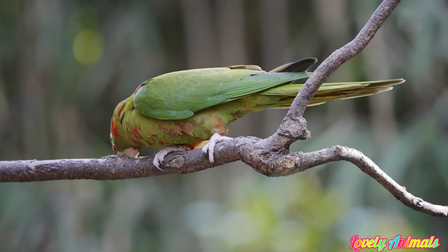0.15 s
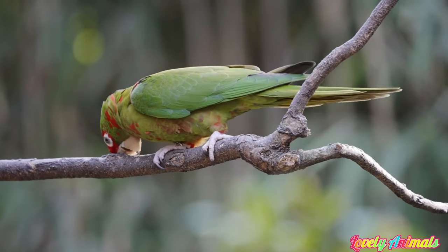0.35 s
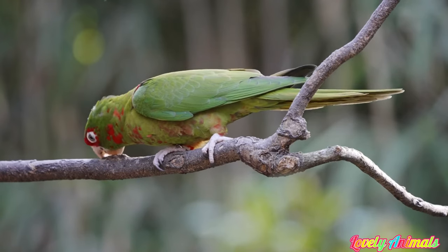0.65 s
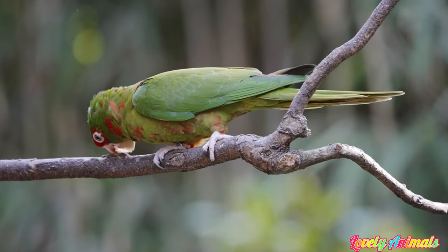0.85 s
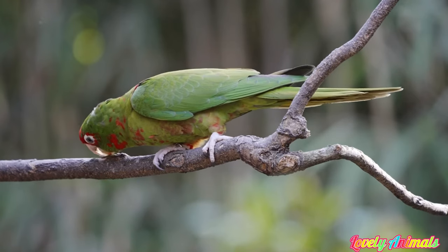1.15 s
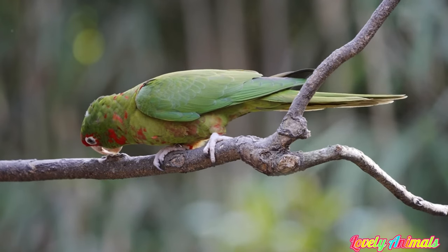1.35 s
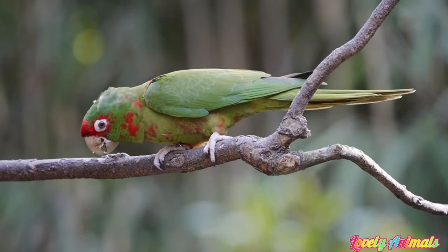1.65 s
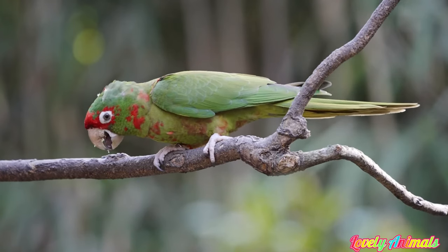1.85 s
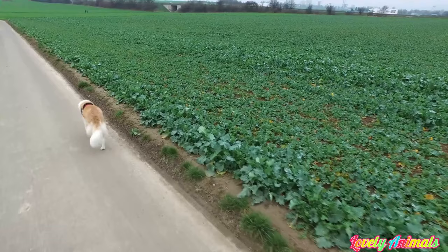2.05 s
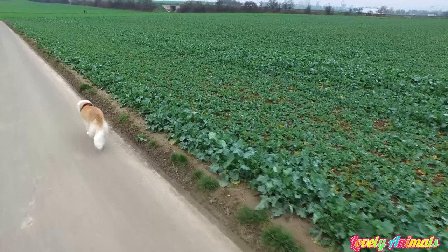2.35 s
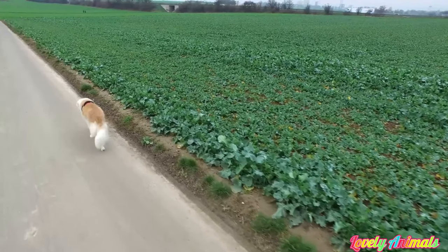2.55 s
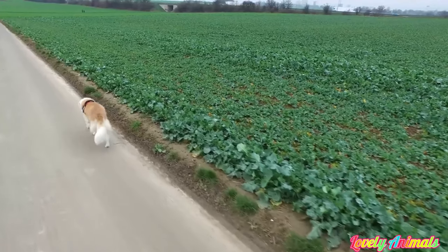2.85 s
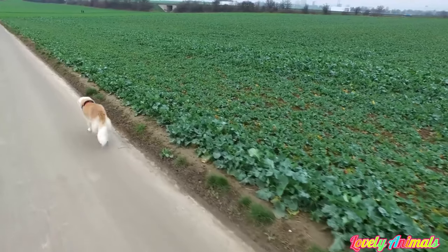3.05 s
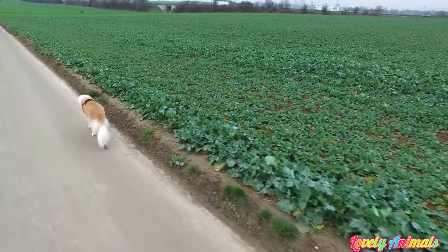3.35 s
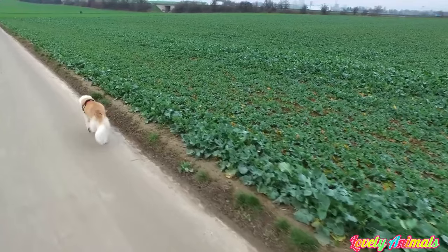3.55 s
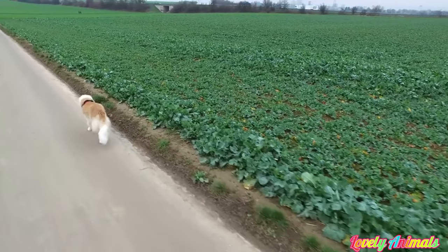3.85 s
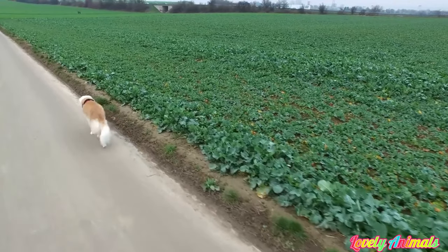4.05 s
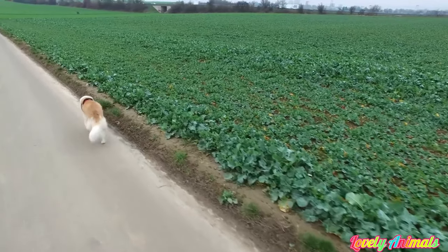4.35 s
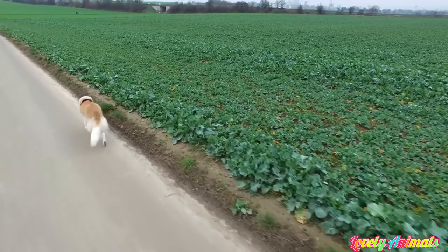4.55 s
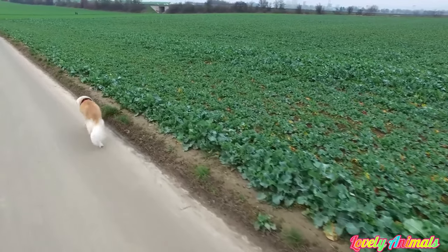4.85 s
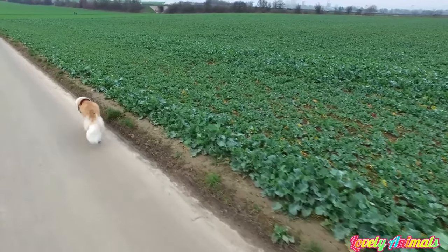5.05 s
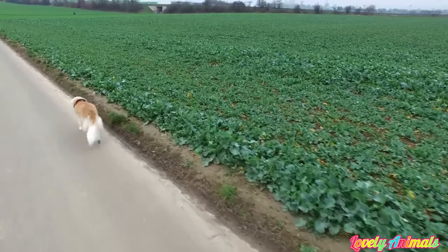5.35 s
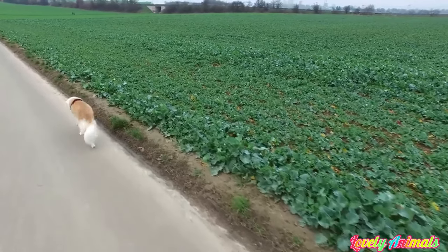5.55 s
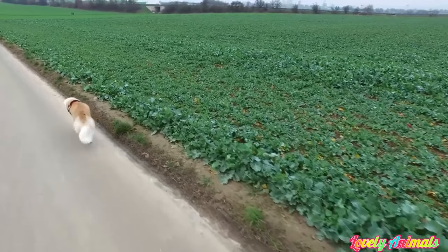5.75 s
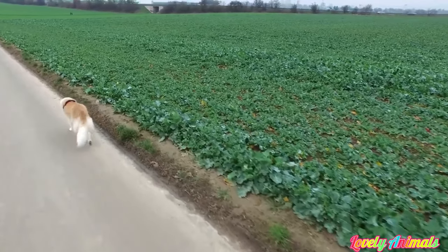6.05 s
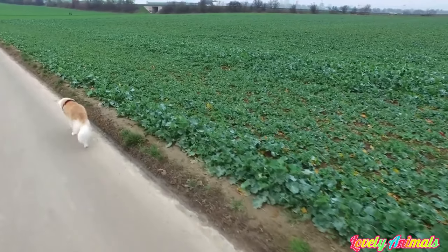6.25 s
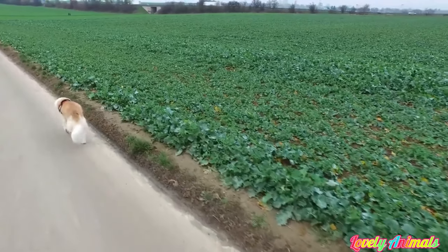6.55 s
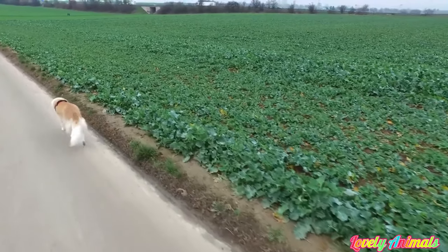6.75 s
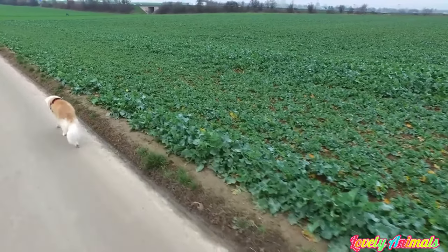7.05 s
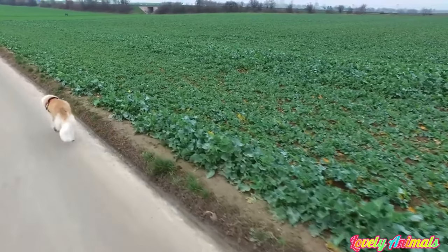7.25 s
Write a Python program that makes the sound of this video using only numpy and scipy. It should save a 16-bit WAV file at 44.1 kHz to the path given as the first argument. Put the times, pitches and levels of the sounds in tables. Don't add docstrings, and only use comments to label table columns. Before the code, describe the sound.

Clear warbling bird whistles come in a rapid run, then a raspy screech, another whistle and a short throbbing squawk near the microphone, with faint coos behind. The background drops out for an instant and changes to a dull rumbling outdoor space. Spaced single yelps come first, then gruff low barks join, reflections trailing after each; a last soft yelp follows near 6.5 seconds.

```python
import sys
import numpy as np
from scipy import signal
from scipy.fft import rfft, irfft, next_fast_len
from scipy.io import wavfile
from scipy.ndimage import uniform_filter1d

SR = 44100
rng = np.random.default_rng(int(sys.argv[2]) if len(sys.argv) > 2 else 0)


def bounce(signal):
    frames = np.transpose(np.atleast_2d(signal))
    limited = np.clip(frames, -1, 1)
    pcm = np.round(limited * 32767).astype(np.int16)
    wavfile.write(sys.argv[1], SR, pcm)


def natural_amplitude(level_db):
    exponent = np.asarray(level_db, float) / 20
    return 10 ** exponent


N = 326340

# frequency in Hz, gain in dB.
SCREECH_BEAK_DB = [(760, -67), (1300, -39.5), (4240, -3), (8060, -25), (10300, -19), (13500, -36.5),
                   (14700, -53), (15500, -48)]


def parrots():
    whistles = all_whistles()
    close, scattered = squawks()
    screeching = screeches()
    far = far_birds()
    thrown = natural_amplitude(-7) * whistles + screeching + natural_amplitude(-2) * scattered + far
    trees = echoes(thrown, gap_s=0.01, near_db=14, near_t60=0.27, far_db=-5.5, far_t60=0.99, dull_hz=5000)
    direct = place(whistles + far, pan_db=2.5, left_lag=0)
    return direct + place(close + screeching, pan_db=-2.24, left_lag=-1) + trees


def all_whistles():
    # time in s, pitch in Hz.
    tunes = [
        [(.18, 1474), (.21, 1973), (.27, 1790), (.328, 2200), (.372, 1700), (.41, 2040), (.428, 1980)],
        [(.26, 1513), (.32, 1844), (.385, 1925), (.415, 2287), (.455, 2274), (.49, 1800)],
        [(.45, 1375), (.495, 1613), (.522, 1953), (.545, 1600), (.61, 1485), (.67, 1310)],
        [(.612, 1633), (.65, 2080), (.72, 1902), (.77, 2108), (.808, 1720), (.846, 1972), (.89, 1670)],
        [(.85, 1584), (.922, 2064), (.975, 1845), (1.0, 2350), (1.03, 2300), (1.068, 1810)],
        [(1.445, 1457), (1.475, 1796), (1.519, 2032), (1.569, 1848), (1.642, 2207), (1.71, 1954)],
        [(1.975, 1487), (2.015, 1940), (2.077, 1840), (2.125, 2217), (2.16, 1887)],
        [(1.595, 2300), (1.62, 2500), (1.64, 1900), (1.655, 1600)],
    ]
    # level at 2 kHz in dB, swell in dB per s, tilt in dB per octave, roughness 0-1.
    blowing = [
        (-40.5, 43, 1.5, 0.12),
        (-41.5, 5, 0, 0.05),
        (-38, 12, -8, 0.12),
        (-37.5, -9.5, -1, 0.01),
        (-44, -61.5, -5, .12),
        (-36.5, -7.5, 0, 0.09),
        (-44, 41, -0.5, 0.16),
        (-42.5, -31, -4.5, .2),
    ]
    # pitch swing as a share, warble rate in Hz.
    warbles = [(.025, 93), (.02, 93), (.04, 42), (.016, 93), (.02, 60), (.025, 93), (.022, 93), (.025, 93)]
    # frequency in Hz, gain in dB.
    beak_db = [(900, -43.5), (1400, -5.5), (2000, -1), (3000, -2.5), (4200, 0), (6000, -10), (9000, -15),
               (12000, -20.5), (15500, -32.5)]
    total = 0
    for tune, how, (share, hz) in zip(tunes, blowing, warbles):
        rows = whistle(tune, *how)
        total = total + voice(rows, beak_db, jitter=0.005, fray=1.0, blur=0.2, warble=share, warble_hz=hz)
    return total


def whistle(tune, level_db, swell, tilt, rough):
    round_s, edge_s, db_per_octave = 0.024, 0.015, 20
    s, hz = np.transpose(tune)
    t = moments(s[0], s[-1])
    pitch = uniform_filter1d(np.interp(t, s, hz), int(round_s * 500) + 1, mode="nearest")
    edge = np.clip(1 - np.minimum(t - s[0], s[-1] - t) / edge_s, 0, 1)
    level = level_db + db_per_octave * np.log2(pitch / 2000) + swell * (t - t.mean()) - 2.5 * edge
    return sing(t, pitch, level, tilt, rough)


def squawks():
    rattle_per_s, rattle_peak_s, rattle_db, rattle_bend = 33, 1.7675, 3.5, 0.11
    # time in s, pitch in Hz, level in dB.
    squawk_path = [
        (1.665, 809, -49),
        (1.719, 901, -32.5),
        (1.74, 1125, -31),
        (1.756, 1303, -27.5),
        (1.829, 1285, -29.5),
        (1.861, 1282, -58),
    ]
    # frequency in Hz, gain in dB.
    squawk_beak_db = [(470, -69), (800, -36.5), (1280, -13.5), (2270, -8), (2570, -2), (3910, -3.5),
                      (4480, -11.5), (10200, -12), (11900, -14.5), (12900, -35.5), (15500, -30)]
    s, hz, db = np.transpose(squawk_path)
    tilt = 1.8 + 0.47 * (db - db.max())
    rough = 0.13 * (1 + (s == s[-1]))
    rows = sing(s, hz, db, tilt, rough)
    throb = np.cos(2 * np.pi * rattle_per_s * (np.arange(N) / SR - rattle_peak_s))
    dip = -(0.5 - 0.5 * throb) ** 2
    close = voice(rows, squawk_beak_db, jitter=0.014, fray=1.0, bend=rattle_bend * dip,
                  swell_db=rattle_db * (2 * dip + 1.5))
    scattered = voice(rows, squawk_beak_db, jitter=0.09, fray=1.0)
    return close, scattered


def screeches():
    # frequency in Hz, gain in dB.
    sag_beak_db = [(1400, -31), (2150, -9), (2850, 2.5), (3600, -14), (4300, -15), (6500, -22),
                   (15500, -39)]
    screech = glide((1.1, 0.13, 900, 757, -34), attack=0.28, start_db=-18.5, end_db=-15,
                    tilt=2.5, dulling=-10.5, rough=0.93)
    sag = glide((1.16, 0.3, 750, 690, -44.5), attack=0.15, start_db=-9, end_db=-7.5,
                tilt=0.6, dulling=0.1, rough=0.33)
    return voice(screech, SCREECH_BEAK_DB, jitter=0.015) + voice(sag, sag_beak_db, jitter=0.015)


def far_birds():
    # start in s, length in s, first pitch in Hz, last pitch in Hz, peak level in dB.
    coo_calls = [
        (.15, .12, 359, 404, -68.5),
        (.43, .21, 304, 335, -70),
        (1.8, .22, 593, 550, -72),
        (1.85, .15, 348, 285, -70),
    ]
    chatter = glide((0, 0.13, 900, 800, -57), attack=0.03, start_db=4.0, end_db=-27,
                    tilt=-5, dulling=-0.1, rough=0.95)
    far = voice(chatter, SCREECH_BEAK_DB, jitter=0.0172)
    for call in coo_calls:
        coo = glide(call, attack=0.41, start_db=-4, end_db=-4, tilt=-21, dulling=0.1, rough=0.17)
        far = far + voice(coo, [(100, -4), (900, 1.5), (1500, -37)], jitter=0.0036, blur=0.1, count=2)
    return far


def glide(call, attack, start_db, end_db, tilt, dulling, rough):
    start, length, first, last, peak_db = call
    share = np.array([0, attack, 1])
    level = peak_db + np.array([start_db, 0, end_db])
    return sing(start + length * share, first + (last - first) * share, level, tilt + dulling * share, rough)


def dogs():
    yelps, barks = high_dog(), low_dog()
    walls = echoes(yelps + natural_amplitude(-2.0) * barks, gap_s=0.013, near_db=8, near_t60=0.43,
                   far_db=-24.5, far_t60=3.54, dull_hz=900)
    return place(yelps, pan_db=-3.5, left_lag=13) + place(barks, pan_db=-2, left_lag=4) + walls


def high_dog():
    # top of the arch in s, top pitch in Hz, level in dB, tilt in dB per octave, roughness 0-1.
    yelp_calls = [
        (2.085, 627.7, -18, 0, 0.4),
        (3.152, 668.2, -16.5, 0.5, 0.39),
        (3.515, 615.8, -17.5, -1.5, 0.1),
        (3.897, 612.8, -18.5, -2.5, 0.09),
        (5.075, 680.4, -19.5, 1, .45),
        (6.556, 683.2, -22, 1.5, 0.09),
    ]
    # frequency in Hz, gain in dB.
    yelp_throat_db = [(250, -66), (400, -20.5), (600, -0.5), (860, -3.5), (1030, -21), (1280, -14),
                      (2400, -31.5), (2750, -28.5), (3500, -53), (4500, -35.5), (6500, -42.5), (8000, -49),
                      (9800, -53), (15500, -73)]
    return sum(voice(yelp(*y), yelp_throat_db, jitter=0.008, fray=1.3, blur=0.34, first_db=-1.5 * y[3], count=5)
               for y in yelp_calls)


def yelp(top_s, top_hz, level_db, tilt, rough):
    rise_s, fall_s, rise_depth, fall_depth = 0.09, 0.07, 0.55, 0.3
    rise_db_per_octave, fall_db_per_octave = 33, 44.5
    ring_hz, ring_width_hz, ring_db = 578.7, 27, 5.5
    tire_db_per_s_hz, easy_hz = 0.91, 613.5
    t = np.clip(moments(-rise_s, fall_s), -rise_s, fall_s)
    rising = t < 0
    way = np.abs(t) / np.where(rising, rise_s, fall_s)
    arch = 1 - np.where(rising, rise_depth, fall_depth) * way ** 1.8
    pitch = top_hz * arch
    level = level_db + np.where(rising, rise_db_per_octave, fall_db_per_octave) * np.log2(arch)
    level = level + ring_db * np.exp(-((pitch - ring_hz) / ring_width_hz) ** 2)
    level = level - tire_db_per_s_hz * max(top_hz - easy_hz, 0) * t
    onset = rising * way
    return sing(top_s + t, pitch, level, tilt - 0.5 * onset, rough * (1.2 - way ** 2) + 0.12 * onset)


def low_dog():
    # start in s, attack in s, hold in s, peak level in dB, tilt in dB per octave.
    bark_calls = [
        (3.987, .06, .003, -17.5, 2),
        (4.831, 0.039, 0.056, -21.5, 2),
        (5.171, 0.064, 0.0083, -18, -1.5),
        (5.488, .066, .012, -20.5, -3),
        (5.802, .075, .014, -21.5, -3.5),
    ]
    # frequency in Hz, gain in dB.
    bark_throat_db = [(180, -67), (280, -6.5), (490, 0), (620, -4.5), (780, -3), (1040, -16), (1330, -9),
                      (1650, -25), (2250, -44.5), (2500, -33), (2800, -41.5), (3600, -45), (4900, -31),
                      (7300, -42), (8500, -44), (15500, -73)]
    return sum(voice(bark(*b), bark_throat_db, jitter=0.016, fray=2.34, blur=0.38, first_db=-16.5, count=11)
               for b in bark_calls)


def bark(start, attack, hold, peak_db, tilt):
    bark_hz, start_db, fall_db_per_s, release_s, whine_db = 252.2, -26, 311, 0.16, -27
    # time into the bark in s, pitch factor.
    pitch_arch = [(0, .62), (.02, .85), (.04, .97), (.1, 1.03), (.135, .9), (.175, 0.57), (.23, .5)]
    t = moments(0, attack + hold + release_s)
    fall_db = -fall_db_per_s * np.maximum(t - attack - hold, 0)
    attack_db = start_db * np.clip(1 - t / attack, 0, 1) ** 1.37
    effort = attack_db + np.maximum(fall_db, whine_db + 0.14 * fall_db)
    pitch = bark_hz * np.interp(t, *np.transpose(pitch_arch))
    opening = 0.4853 * effort * np.where(fall_db == 0, 1, -0.3)
    whining = fall_db < whine_db
    return sing(start + t, pitch, peak_db + effort, tilt + opening - 12 * whining, 0.11)


def moments(start, stop):
    return np.linspace(start, stop, int((stop - start) * 500) + 2)


def sing(t, *controls):
    return np.transpose(np.broadcast_arrays(t, *controls))


def voice(rows, throat, jitter, fray=0.61, blur=0.57, first_db=0, count=30, warble=0.0, warble_hz=90,
          bend=0, swell_db=0):
    s, *columns = np.transpose(rows)
    start, stop = int(s[0] * SR), int(s[-1] * SR)
    t = np.arange(start, stop) / SR
    pitch, level_db, tilt, rough = [np.interp(t, s, c) for c in columns]

    shake, pace, depth = wander((3, len(t)), 40)
    trill_phase = 2 * np.pi * np.cumsum(warble_hz * (1 + 0.086 * pace)) / SR
    trill = (1 + 0.35 * depth) * np.sin(trill_phase)
    steady = pitch * (1 + (bend[start:stop] if np.ndim(bend) else 0))
    pitch = steady * (1 + jitter * shake + warble * trill)

    k = np.arange(1, min(count, int(15800 / pitch.mean())) + 1)[:, None]
    gains = natural_amplitude(tilt * np.log2(k) + first_db * (k == 1)) * (k * pitch < 16000)
    loudness = np.sqrt(np.sum((gains * natural_amplitude(at_hz(throat, k * steady))) ** 2, axis=0) / 2)

    clear = (1 - np.clip(rough, 0, 0.99)) ** (k ** fray)
    narrow = signal.butter(3, blur * pitch.mean(), fs=SR, output="sos")
    smear = signal.sosfilt(narrow, rng.standard_normal((2 * len(k), len(t) + 400)))[:, 400:]
    smear = smear / smear.std() * np.sqrt((1 - np.tile(clear, (2, 1))) / 2)
    turn = k * 2 * np.pi * np.cumsum(pitch) / SR + rng.uniform(0, 2 * np.pi, k.shape)
    in_phase = (np.sqrt(clear) + smear[:len(k)]) * np.sin(turn)
    quadrature = smear[len(k):] * np.cos(turn)
    source = np.sum(gains * (in_phase + quadrature), axis=0)
    if len(k) == count:
        above = signal.butter(4, (count + 0.5) * pitch.mean(), "high", fs=SR, output="sos")
        breath = signal.sosfilt(above, rng.standard_normal(len(t)))
        source = source + natural_amplitude(2 * tilt) * np.sqrt(SR / 4 / pitch) * breath

    size = next_fast_len(len(t))
    response = natural_amplitude(at_hz(throat, np.arange(size // 2 + 1) * SR / size))
    sound = irfft(rfft(source, size) * response, size)[:len(t)]
    edge = np.clip(np.minimum(t - t[0], t[-1] - t) / 0.0045, 0, 1)
    level_db = level_db + 90 * warble * trill + (swell_db[start:stop] if np.ndim(swell_db) else 0)
    out = np.zeros(N)
    out[start:stop] = natural_amplitude(level_db) * edge * sound / loudness
    return out


def wander(shape, hz):
    r = np.exp(-2 * np.pi * hz / SR)
    noise = rng.standard_normal((shape[0], shape[1] + 1000))
    slow = signal.lfilter([1], [1, -2 * r, r * r], noise)[:, 1000:]
    return slow / slow.std()


def at_hz(points, hz):
    points_hz, values = np.transpose(points)
    return np.interp(np.log(np.maximum(hz, 1)), np.log(points_hz), values)


def place(x, pan_db, left_lag):
    return np.array([np.roll(x, left_lag), x]) * natural_amplitude(np.array([[pan_db / 2], [-pan_db / 2]]))


def echoes(x, gap_s, near_db, near_t60, far_db, far_t60, dull_hz):
    t = np.arange(2 * SR) / SR
    near, far = rng.standard_normal((2, 2, len(t))) / np.sqrt(SR)
    far = signal.sosfilt(signal.butter(2, dull_hz, fs=SR, output="sos"), far)
    answer = near * natural_amplitude(near_db - 60 * t / near_t60) + far * natural_amplitude(far_db - 60 * t / far_t60)
    answer = answer * np.clip(t / gap_s, 0, 1)
    back = signal.fftconvolve(np.trim_zeros(x, "b")[None], answer, axes=1)[:, :N]
    return np.pad(back, ((0, 0), (0, N - back.shape[1])))


def air(spectrum, level_db, likeness):
    hz = np.arange(N // 2 + 1) * SR / N
    mid, side = rfft(rng.standard_normal((2, N))) * natural_amplitude(at_hz(spectrum, hz))
    alike = np.clip(at_hz(likeness, hz), -1, 1)
    out = irfft(np.sqrt(1 + alike) * mid + np.sqrt(1 - alike) * side * [[1], [-1]], N)
    return natural_amplitude(level_db) * out / out.mean(axis=0).std()


def scene():
    trees_end_s, fade_s, yard_start_s = 2.156, 0.0023, 2.188
    # (Hz, left-right likeness -1 to 1).
    trees_air = ([(12, -31), (20, -1), (285, -6.5), (366, -9.5), (512, -11), (1000, -14.5), (1090, -17),
                  (1800, -12), (3840, -9.5), (16000, -27.5)], -63, [(60, 0.25), (380, 0.34), (2380, 0.72),
                  (15000, 0.31)])
    yard_air = ([(12, -65.5), (20, -7.5), (86, -2), (241, -18.5), (285, -13.5), (377, -27), (623, -23.5),
                 (975, -30), (1250, -34), (1400, -33), (2260, -37.5), (3950, -41.5), (16000, -48.5)],
                 -54.5, [(60, 0.35), (240, 0.13), (950, 0.17), (3770, -0.19), (15000, -0.072)])
    t = np.arange(N) / SR
    first = np.where(t < trees_end_s, 1, 0.19 * np.exp(-np.abs(t - trees_end_s) / fade_s))
    second = np.clip((t - yard_start_s) / 0.0015, 0, 1)
    return first * (parrots() + air(*trees_air)) + second * (dogs() + air(*yard_air))


def top_cut(x):
    return signal.sosfilt(signal.butter(12, 16120, fs=SR, output="sos"), x)


def record(dry):
    low_pass = signal.cheby2(18, 60, 16250, fs=SR, output="sos")
    return top_cut(signal.sosfilt(low_pass, dry))


dry = scene()
out = record(dry)
bounce(out)
```